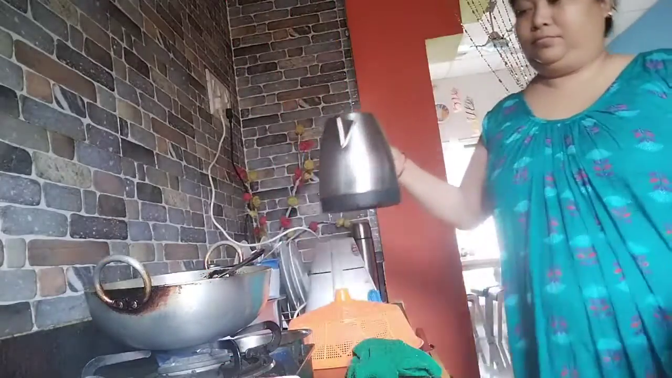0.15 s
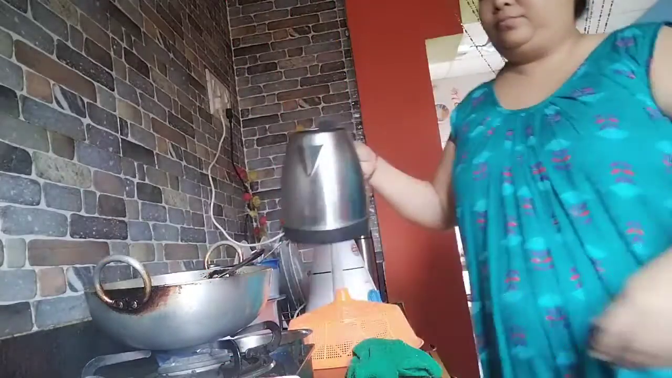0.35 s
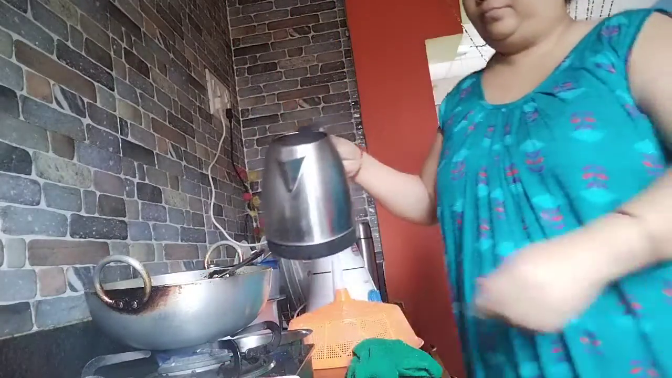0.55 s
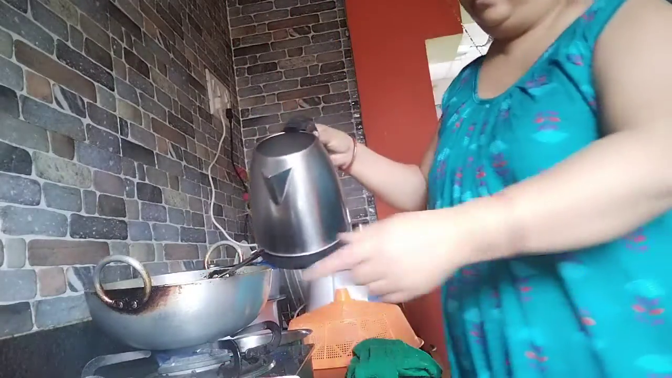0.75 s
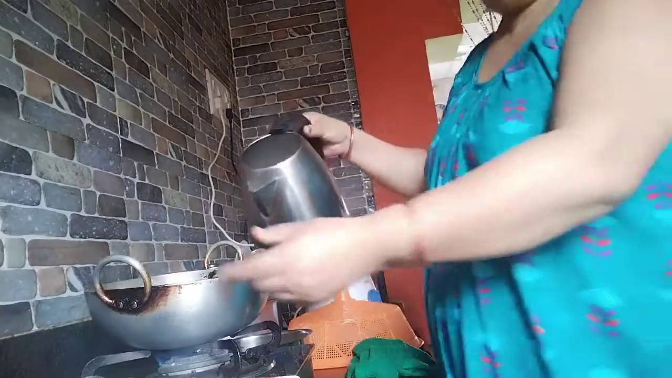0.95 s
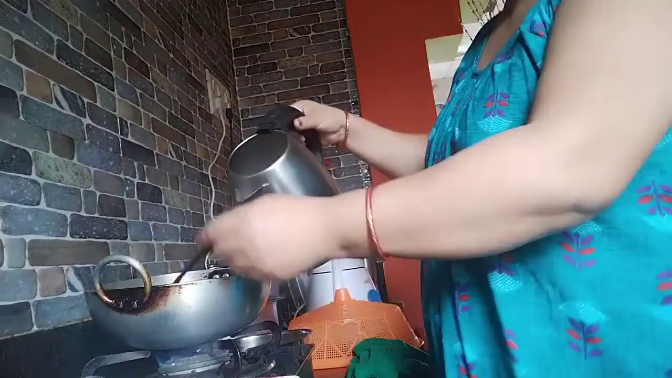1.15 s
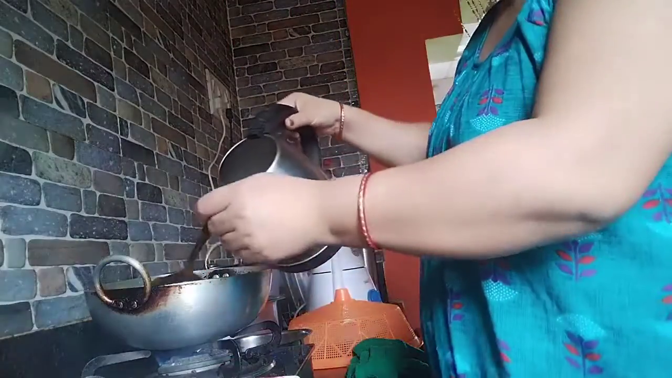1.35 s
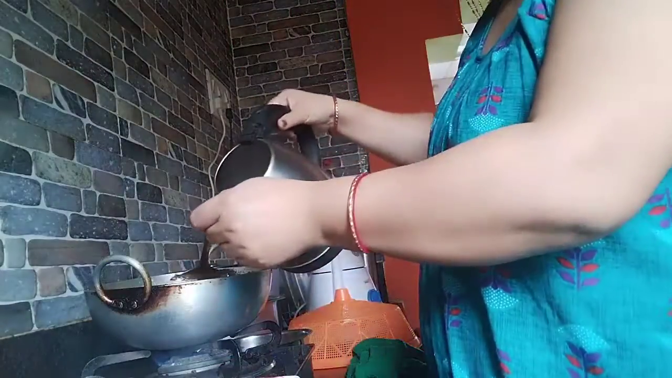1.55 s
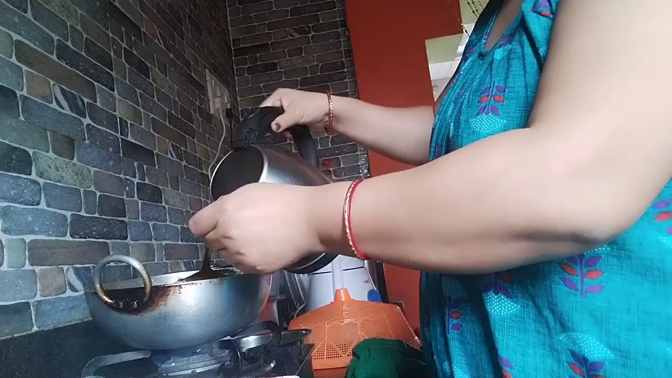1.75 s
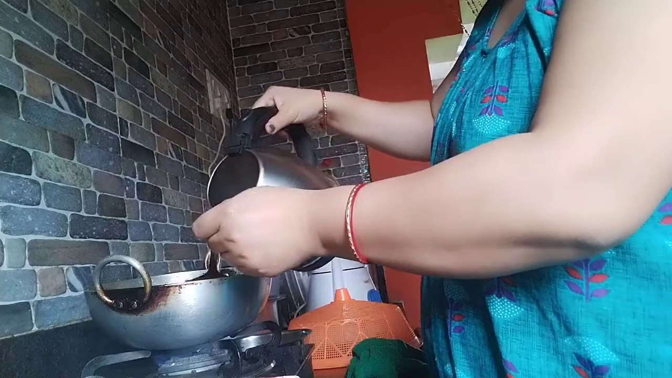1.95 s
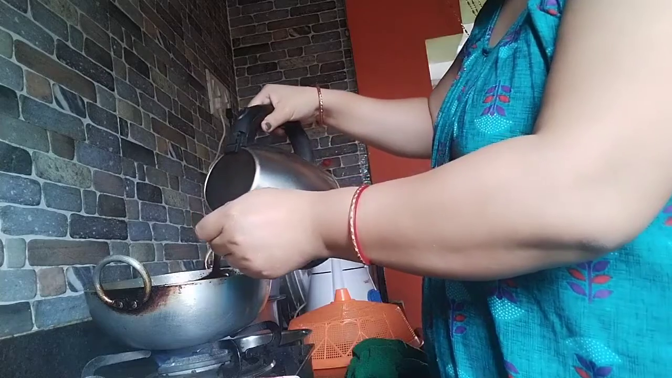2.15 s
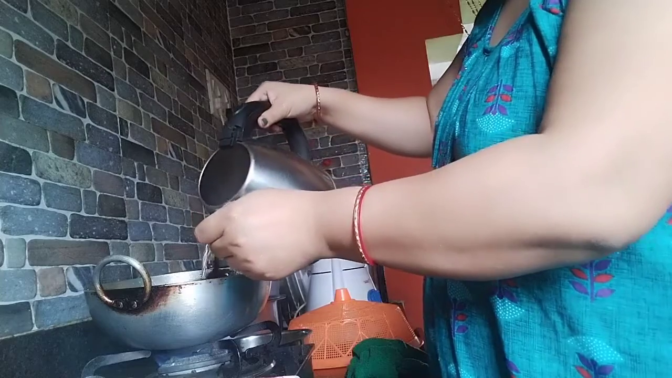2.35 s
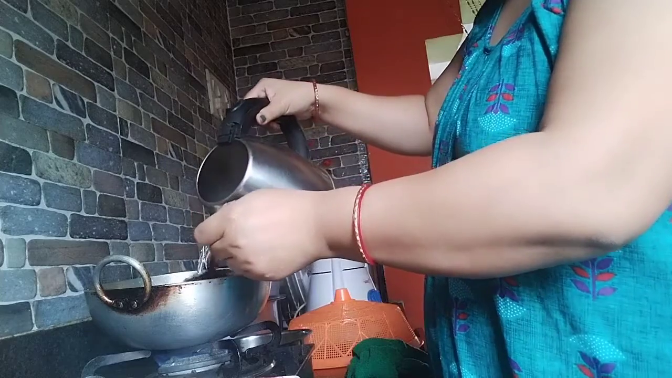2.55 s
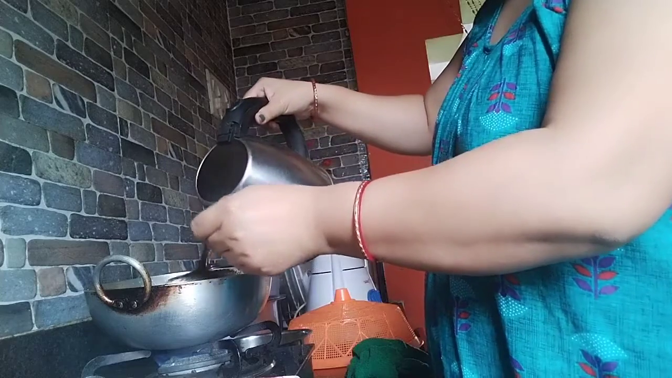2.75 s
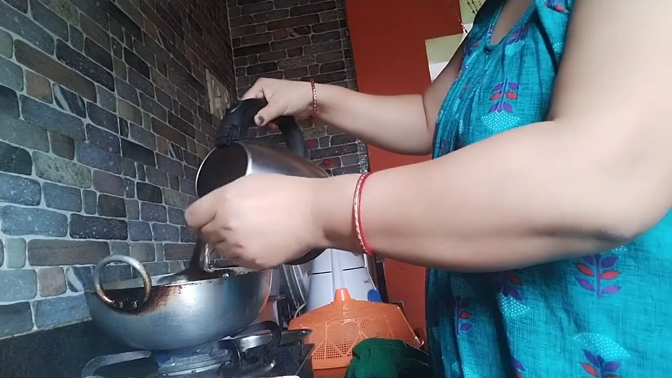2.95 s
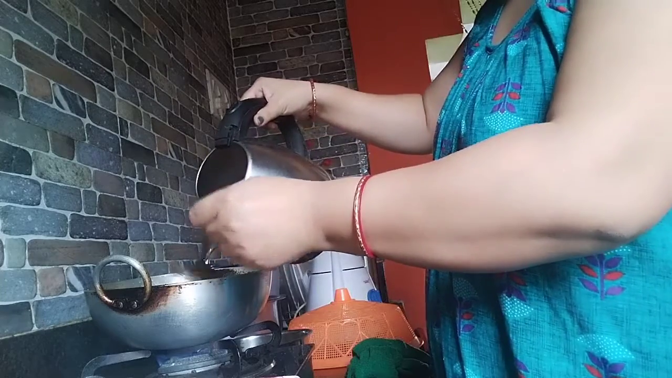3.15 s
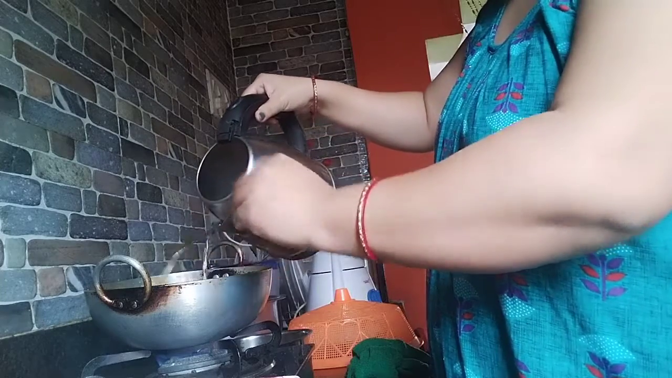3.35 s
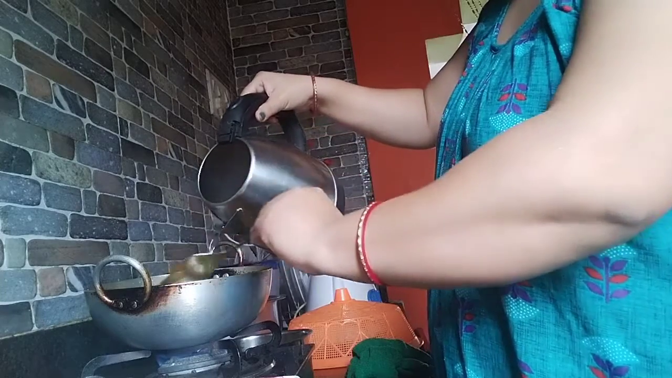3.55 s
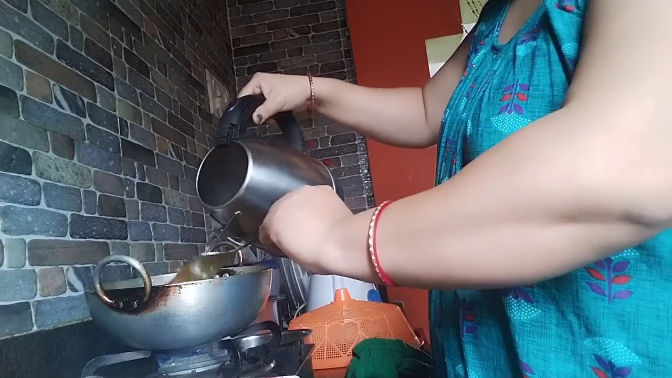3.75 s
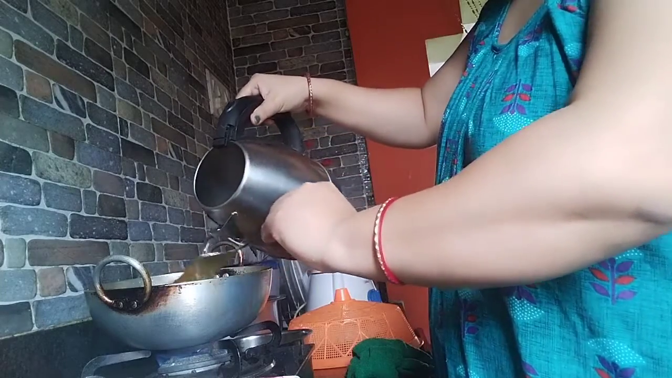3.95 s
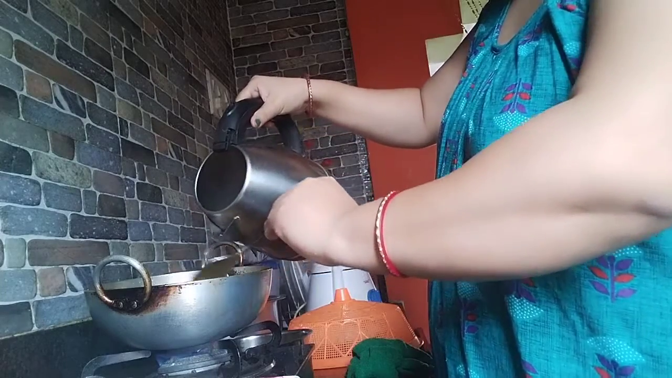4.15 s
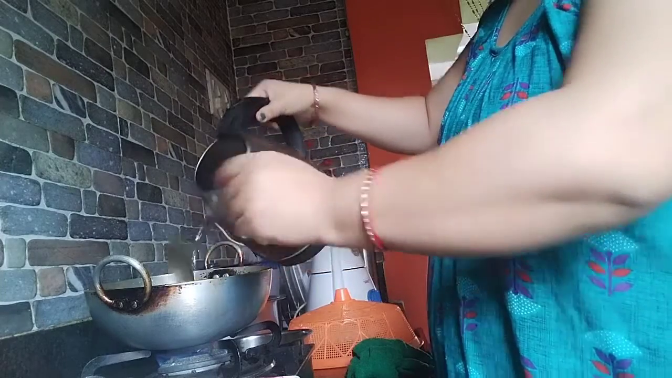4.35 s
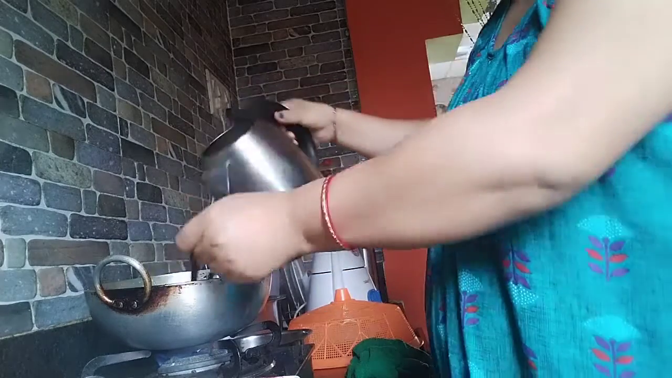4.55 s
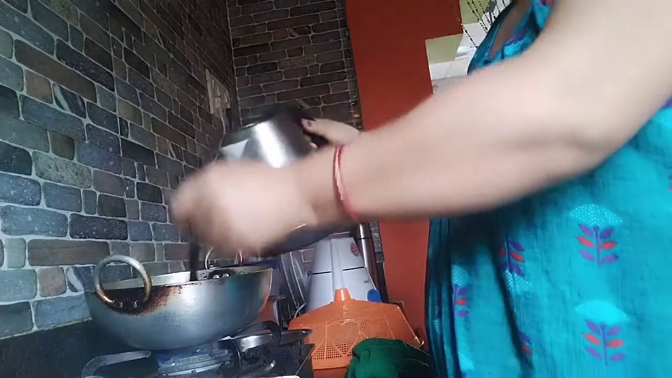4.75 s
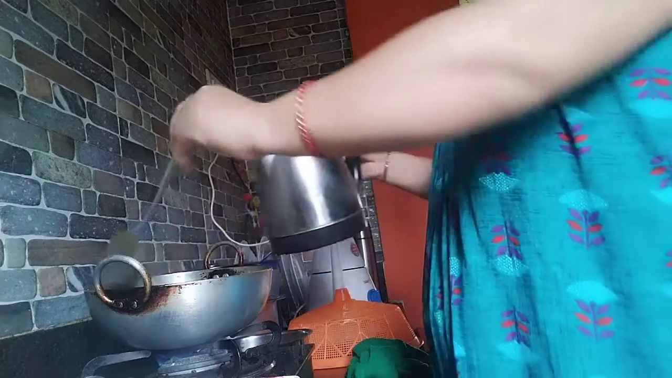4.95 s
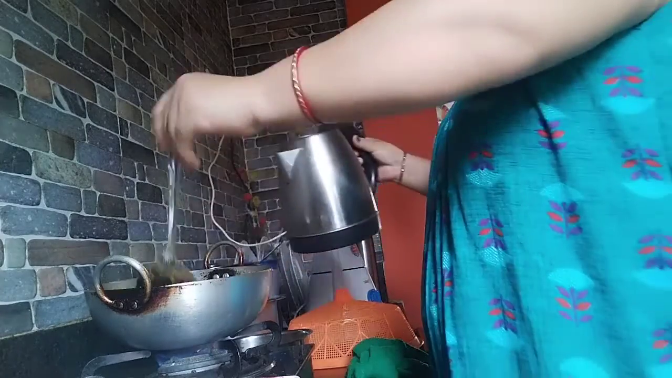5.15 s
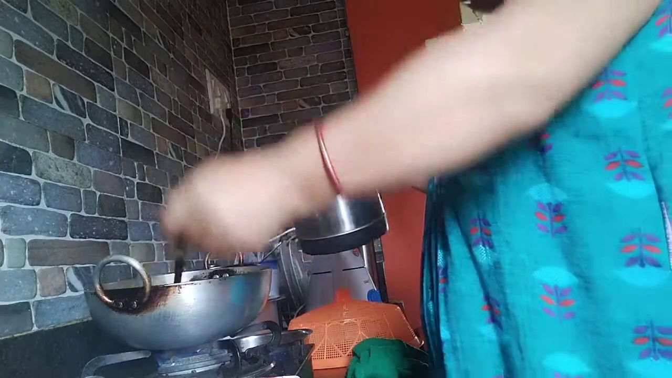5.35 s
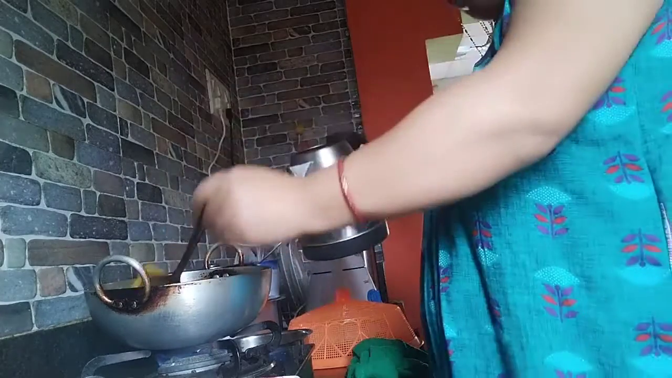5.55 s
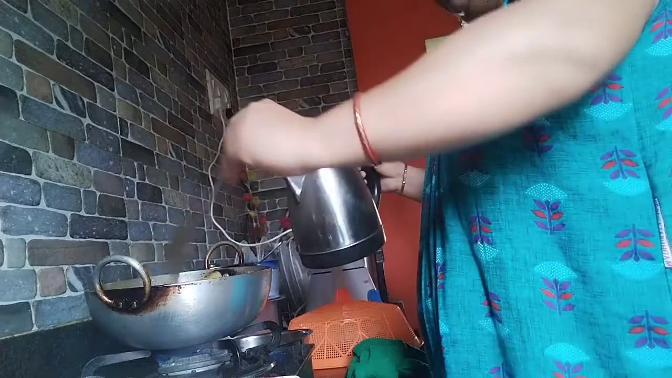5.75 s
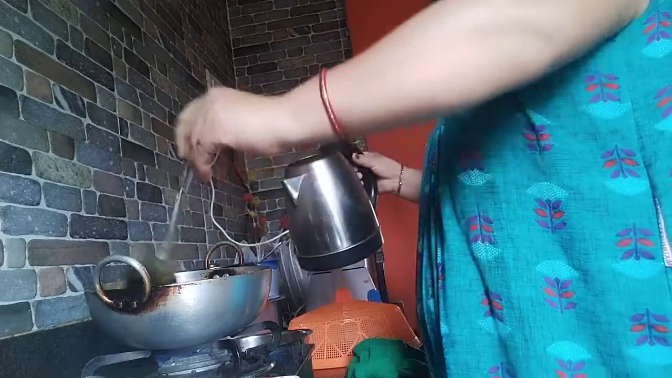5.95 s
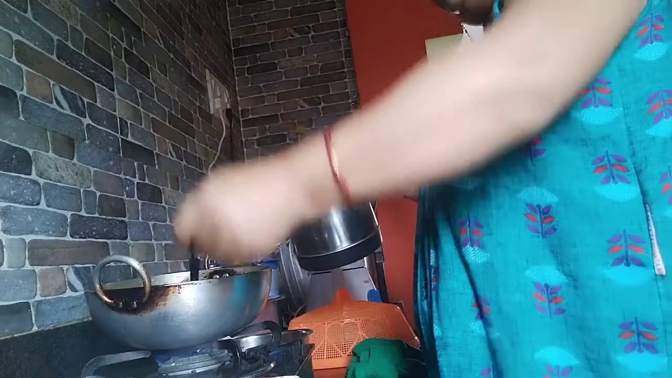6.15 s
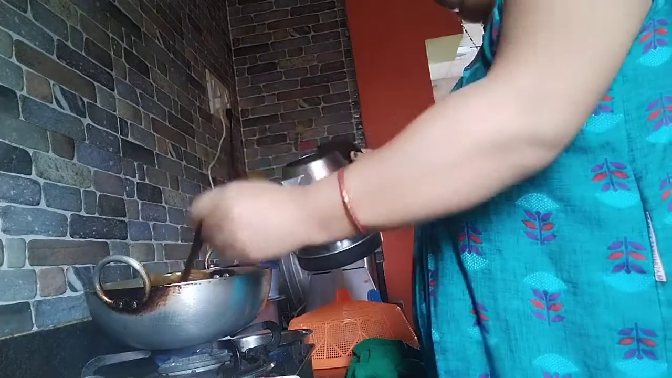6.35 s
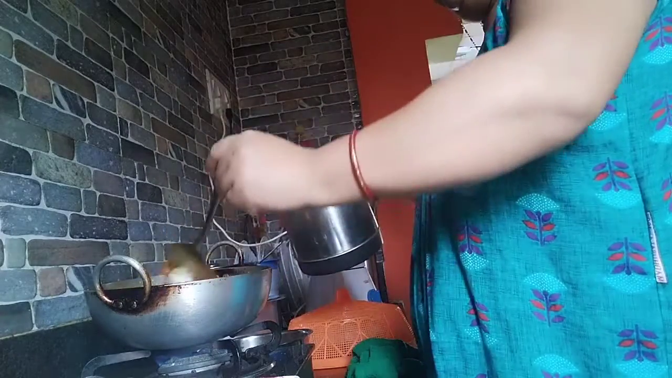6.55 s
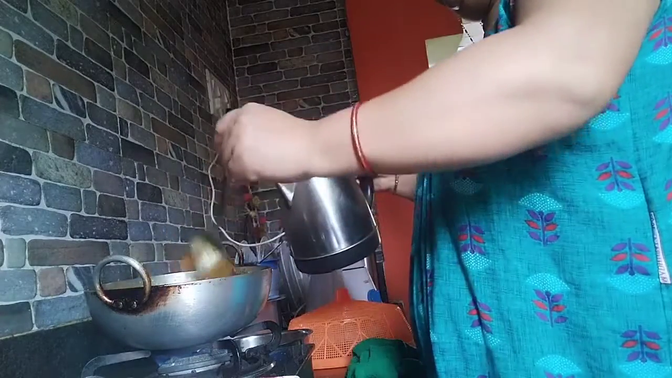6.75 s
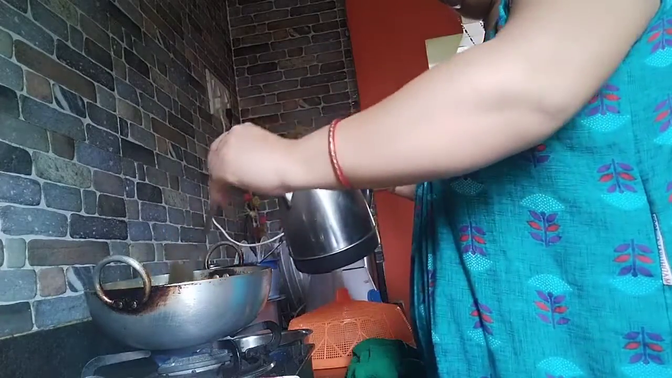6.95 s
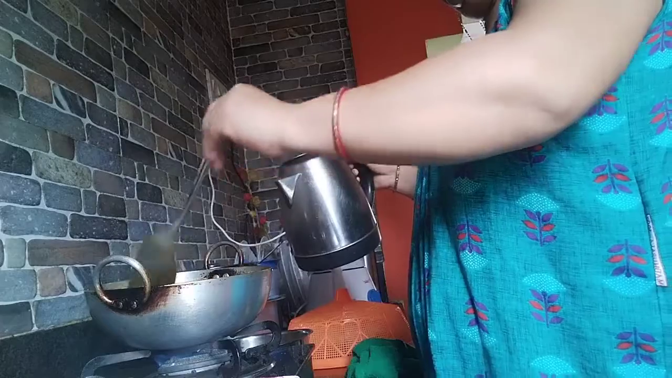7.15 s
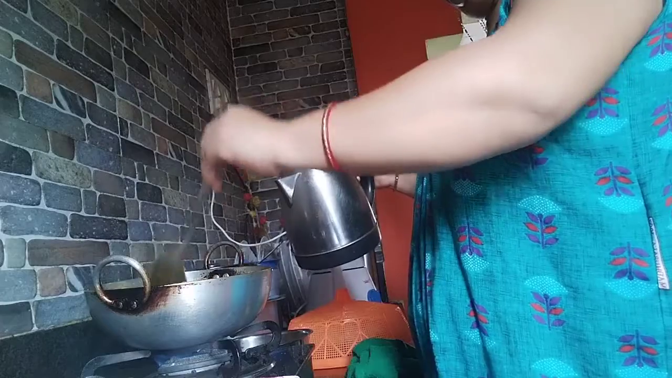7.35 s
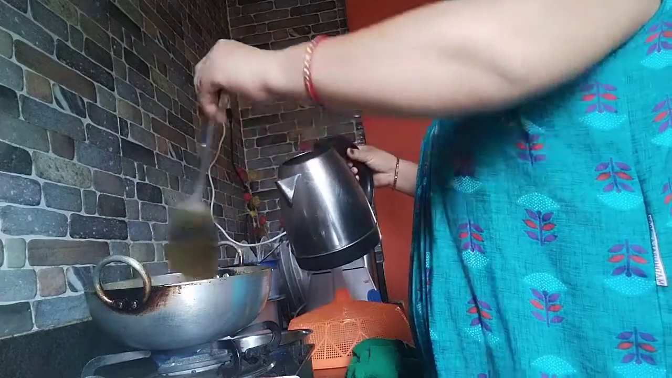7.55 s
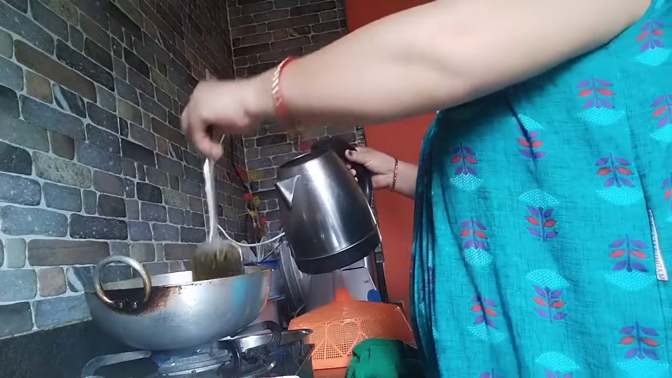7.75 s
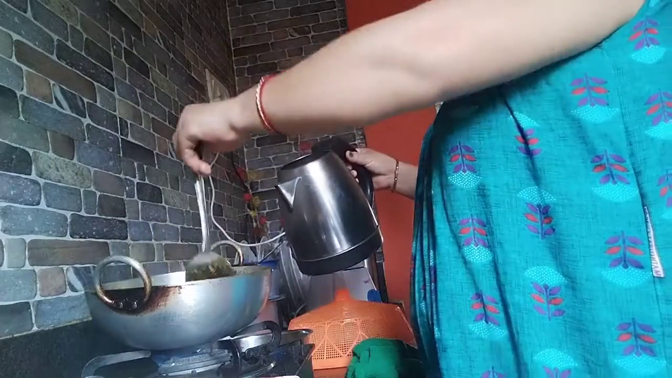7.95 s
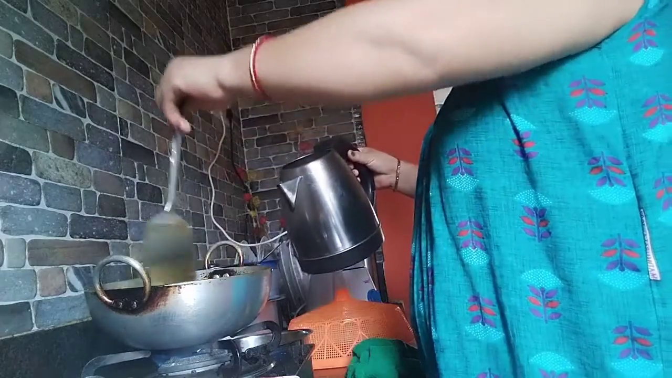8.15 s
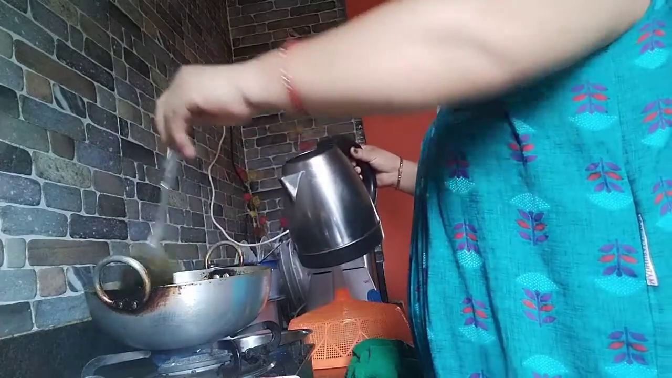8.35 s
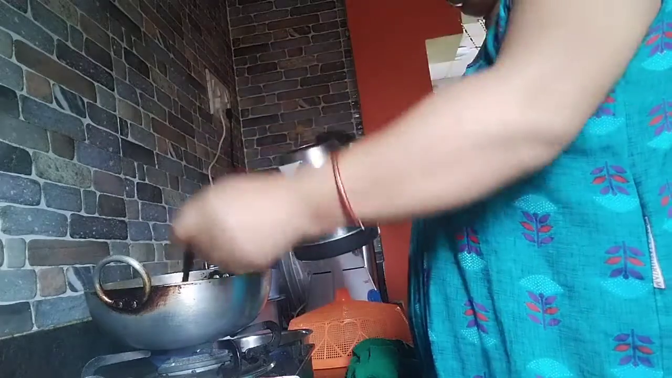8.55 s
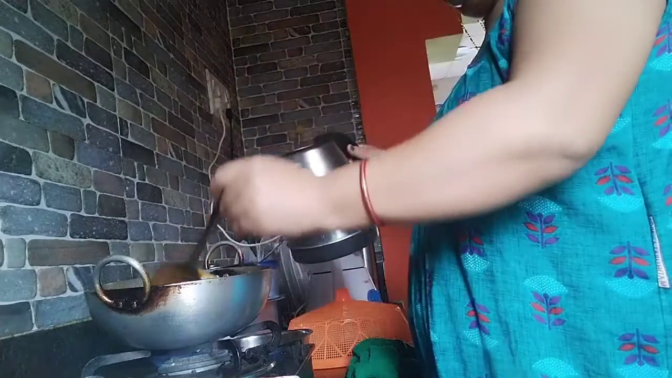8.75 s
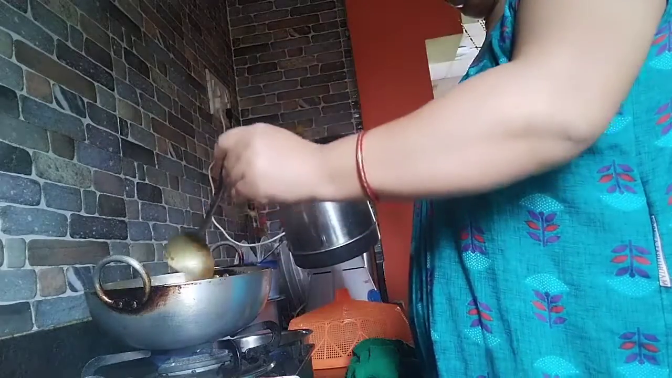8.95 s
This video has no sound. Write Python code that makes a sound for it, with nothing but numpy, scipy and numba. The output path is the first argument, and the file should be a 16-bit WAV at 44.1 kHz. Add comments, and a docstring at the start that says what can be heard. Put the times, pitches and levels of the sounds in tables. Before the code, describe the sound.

First, soft hiss and crackle of hot fat, with small flares and spits, a low steady hum, faint hooting calls outside and short water glugs. Then a ladle strikes and drags on a food-filled steel pan in irregular bursts, some loud and ringing, some light. The sizzle dies down late. Close phone microphone, slight short echo from hard tiles, dull top end.

```python
"""Kitchen stove: a ladle knocks and scrapes a steel pan full of food, an arm's length from a phone.
Blows (short noise cracks) and stick-slip clicks drive broad bands and tuned resonators, the pan's modes.
Filtered noise and clicks sizzle, with flares and spits, later fainter, as is the low hum of coloured noise.
Poured water glugs as decaying sines; narrow noise makes a hollow, warbling call from outdoors.
Delay lines echo the pan and the glugs from the tiles."""
import sys
import numpy as np
from scipy import signal
from scipy.fft import rfft, irfft, next_fast_len
from scipy.io import wavfile
from scipy.ndimage import uniform_filter1d
from numba import njit

SR = 44100
rng = np.random.default_rng(int(sys.argv[2]) if len(sys.argv) > 2 else 0)


def bounce(signal):
    """Save signal as a 16-bit WAV file at the path given by the first command-line argument."""
    frames = np.transpose(np.atleast_2d(signal))
    limited = np.clip(frames, -1, 1)
    pcm = np.round(limited * 32767).astype(np.int16)
    wavfile.write(sys.argv[1], SR, pcm)


N = 396018

# broad bands of the struck pan, in order thud, clang, ring, tick, grit: [f/Hz, width/Hz]
BANDS = [(360, 620), (1000, 800), (2300, 2130), (4200, 1150), (6700, 12000)]


def undb(db):
    """Decibels to gain."""
    return 10 ** (np.asarray(db) / 20)


def unit(x):
    """Scale to rms 1."""
    return x / np.sqrt(np.mean(x ** 2))


def walk(rate_hz):
    """Random levels held 1 / rate_hz s, then slewed twice; spread near 1."""
    hold = int(SR / rate_hz)
    steps = np.repeat(rng.standard_normal(N // hold + 1), hold)
    return 1.796 * uniform_filter1d(uniform_filter1d(steps, hold), hold)[:N]


def clicks(per_s, spread_db):
    """Random clicks of either sign and exponentially spread level, rms 1."""
    hits = rng.random(N) < per_s / SR
    sign = rng.choice([-1, 1], N)
    size_db = spread_db * np.minimum(rng.exponential(size=N), 4.5)
    return unit(hits * sign * undb(size_db))


def curve(rows):
    """Gain along a table of (t/s, level/dB) points."""
    return undb(np.interp(np.arange(N) / SR, *np.transpose(rows)))


def swell(notes):
    """Summed powers of rows (t at full level/s, level/dB, rise/(dB/s), hold/s, fall/(dB/s)), as a gain."""
    t, power = np.arange(0, N + 32, 32) / SR, 1e-14
    for s, db, rise, hold, fall in notes:
        early_s = np.maximum(s - t, 0)
        late_s = np.maximum(t - s - hold, 0)
        power = power + undb(2 * (db - rise * early_s - fall * late_s))
    return np.interp(np.arange(N) / SR, t, np.sqrt(power))


@njit
def svf(x, hz, width):
    """State-variable band-pass with a moving centre, gain 1 at the centre."""
    y, b, l = np.empty(len(x)), 0., 0.
    for i in range(len(x)):
        g, k = np.tan(np.pi * hz[i] / SR), width / hz[i]
        v = (b + g * (x[i] + 1e-18 - l)) / (1 + g * (g + k))
        b, l, y[i] = 2 * v - b, l + 2 * g * v, k * v
    return y


def band(x, hz, width):
    """Fixed fourth-order band-pass."""
    half = np.sqrt(hz ** 2 + width ** 2 / 4)
    edges_hz = [half - width / 2, half + width / 2]
    return signal.sosfilt(signal.butter(2, edges_hz, "band", fs=SR, output="sos"), x)


def coloured(source, colour, flicker_db):
    """Shape a source by a spectrum, rms 1; overlapping bands half an octave apart flicker on their own."""
    hz, db = np.transpose(colour)
    size = next_fast_len(N)
    octave = np.log2(np.arange(1, size // 2 + 2) * SR / size)
    spectrum = rfft(source, size) * undb(np.interp(octave, np.log2(hz), db))
    out = 0
    for centre in np.arange(np.log2(hz[0]), np.log2(hz[-1]), .5):
        triangle = np.maximum(1 - 2 * abs(octave - centre), 0)
        out = out + undb(flicker_db * walk(18)) * irfft(spectrum * triangle, size)[:N]
    return unit(out)


def hum():
    """Burner roar and far traffic: coloured noise under a slow level curve."""
    # level: [t/s, level/dB]
    hum_level = [(0, -66), (.63, -64), (2.27, -66.5), (2.53, -62.5), (2.9, -66), (5.1, -67), (6.2, -68),
                 (7.7, -70.5), (8.98, -72.5)]
    # relative spectral density: [f/Hz, density/dB]
    hum_colour = [(15, -64.5), (25, -34), (37, -19), (103, 2.5), (145, -3.5), (230, 0), (398, -4.5),
                  (506, -4.5), (586, -7), (666, -2), (830, -3.5), (1410, -5.5), (2000, -27), (2600, -30.5),
                  (4400, -120)]
    return coloured(rng.standard_normal(N), hum_colour, 1.0) * curve(hum_level)


def call():
    """A hollow call from outdoors: two close, wavering tones of narrow noise beat against each other."""
    # notes: [t at full level/s, level/dB, hold/s, fall/(dB/s)]
    call_notes = [(0.638, -54, 0.24, 248), (0.933, -49.5, 0.21, 115), (1.318, -61.5, 0.008, 300),
                  (4.11, -50.5, 0.0086, 896), (4.156, -45, 0.031, 600), (4.207, -51, 0.013, 300),
                  (4.257, -53.5, 0.074, 140), (4.475, -61.5, .005, 144), (5.045, -50, 0.15, 250),
                  (5.306, -51.5, 0.33, 116)]
    # faint side tones: [f/Hz, level re main tones/dB]
    side_tones = [(650, -15), (1120, -22.5)]
    centre_hz, waver_hz, offset_hz, width_hz = 747, 4, 20.6, 42.3
    rise_db_per_s = 600
    pair, hz = 0, centre_hz + waver_hz * walk(9)
    for side in (-1, 1):
        tone = rng.standard_normal(N)
        for _ in range(3):
            tone = svf(tone, hz + side * offset_hz, width_hz)
        pair = pair + tone
    # level out swings slower than the 68 ms window
    steady = pair / np.sqrt(uniform_filter1d(pair ** 2, size=3000))
    for side_hz, db in side_tones:
        steady = steady + undb(db) * unit(band(rng.standard_normal(N), side_hz, width_hz))
    return steady * swell([(s, db, rise_db_per_s, hold, fall) for s, db, hold, fall in call_notes])


def sizzle():
    """Tiny steam bubbles burst in the fat: hiss and crackle, flares where water meets it, louder spits."""
    # steady level: [t/s, level/dB]
    sizzle_level = [(0, -59.5), (1.5, -59.5), (1.9, -58.5), (3.6, -61), (4.5, -62), (4.67, -67), (5.1, -67),
                    (5.9, -58.5), (6.8, -70.5), (7.7, -74.5), (8.35, -77), (8.98, -77.5)]
    # relative spectral density: [f/Hz, density/dB]
    sizzle_colour = [(900, -10.5), (1300, -5.5), (1500, -2.5), (1950, -5), (2400, 2), (3100, 1.5),
                     (3900, 4), (4700, -3), (6000, -2.5), (7300, -6.5), (8400, -12), (9300, -27),
                     (11000, -29.5), (12000, -23), (13500, -35), (15000, -20), (16000, -26)]
    # water meets hot fat: [t at full level/s, level/dB]
    flares = [(.81, -55), (1.59, -76), (2.67, -56.5), (4.53, -64)]
    # fat spitting: [t/s, level before decay/dB, f/Hz]
    spits = [(0.7994, -59, 2840), (1.131, -56.5, 2510), (1.176, -56.5, 2600), (1.5843, -56.5, 4200),
             (1.873, -53.5, 3870), (1.944, -58, 2430), (2.143, -59, 3930), (2.211, -57, 2870),
             (2.6585, -52.5, 4740), (2.821, -60, 3800), (3.09, -61, 3530), (3.5438, -60, 2440),
             (3.791, -58, 3140), (4.084, -59, 3540), (4.389, -60, 3160), (4.518, -58.5, 3900),
             (4.81, -63, 3930), (6.67, -65, 3940), (7.778, -68, 6600), (8.842, -68.5, 2820)]
    crackle_per_s, crackle_spread_db, crackle_db = 450, 1.5, -7
    flare_rise_db_per_s, flare_fall_db_per_s = 196, 160
    burst = rng.standard_normal(N) + undb(crackle_db) * clicks(crackle_per_s, crackle_spread_db)
    hiss = coloured(burst * undb(0.26 * walk(17)), sizzle_colour, 1.0)
    flare_gain = swell([(s, db, flare_rise_db_per_s, 0, flare_fall_db_per_s) for s, db in flares])
    out = hiss * np.hypot(curve(sizzle_level), flare_gain)
    fade = np.exp(-np.arange(600) / SR / 0.025)
    for (s, db, hz), grit in zip(spits, rng.standard_normal((len(spits), 600))):
        i = int(s * SR)
        out[i:i + 600] += undb(db) * fade * unit(band(grit, hz, 0.3 * hz))
    return out


def glugs():
    """Air pockets in the poured water ring briefly: decaying sines with a 12 ms onset ramp."""
    # [t/s, level before ramp and decay/dB, f/Hz, T60/s]
    air_pockets = [(1.128, -38, 940, 0.048), (2.467, -50.5, 516, 0.14), (2.509, -50, 524, 0.13)]
    out, time = np.zeros(N), np.arange(6000) / SR
    for s, db, hz, t60 in air_pockets:
        envelope = np.minimum(time / 0.012, 1) * 1000 ** (-time / t60)
        i = int(s * SR)
        out[i:i + 6000] += undb(db) * envelope * np.sin(2 * np.pi * hz * time)
    return out


def contact():
    """Force of ladle on steel per band: noise cracks for blows, stick-slip clicks for rattles and drags."""
    # blows: [t/s, level/dB, tilt/(dB/octave), bend/(dB/octave^2), thud re level/dB, rattle re level/dB]
    blows = [(5.16, -43, 6, -0.5, -26, -4), (5.233, -33, 1, -1, -36, -6.5),
             (5.304, -28.5, -4, 1.5, -16, -15), (5.349, -32, -5.5, -1, 7, -7.5),
             (5.413, -36, -11, -1, -7, -18), (5.496, -44, 1, 2.5, -16.5, -7.5),
             (5.995, -24.5, 1.6, 1.5, -15.5, -14), (6.071, -39, 0.5, 2, -7.5, -6),
             (6.124, -14, 0, -3.5, -16, -13), (6.196, -28.5, 23, -19, -17.5, -14),
             (6.229, -35.5, 5, -3.5, -18.5, 0), (6.509, -39, 4.5, -4, -26.5, -9),
             (7.009, -35, -4, 1, -19, -6.5), (7.333, -30.5, -7, 4.5, -3, -9),
             (7.881, -14.5, -2, 0, -20.5, -13.5), (8.39, -51, 21.5, -16.5, -16.5, -2.5),
             (8.523, -48, -7, -1, -26, -6), (8.541, -43.5, 11, -7, -25.5, -2),
             (8.553, -45, -9, 0, -20, -14), (8.608, -49.5, -5, -1.5, -20, -9)]
    # drags: [t at full level/s, level/dB, tilt/(dB/octave), bend/(dB/octave^2), thud re level/dB,
    #         rise/(dB/s), hold/s, fall/(dB/s)]
    drags = [(5.169, -48, 3.5, 0.5, -24, 780, 0.046, 250), (5.298, -44, -3, 0, -0.5, 400, 0.085, 200),
             (5.41, -44.5, -2.5, 1.8, -7, 399, 0.035, 85), (5.603, -54, 4, 0, -14, 102.6, 0.037, 27),
             (6.052, -42.5, -6, -12, -16, 293, 0.066, 200), (6.145, -36, -5, -6.5, -26, 890, 0.028, 199),
             (6.257, -42, -2.3, 0.7, -19, 197.5, 0.02, 161), (6.335, -54, -3.5, 2, -4, 300, 0.024, 173),
             (7.913, -37, -7, -6.5, -1, 884, 0.068, 196), (8.076, -45, -10.5, -6.5, 3, 198, 0.013, 146),
             (8.502, -50.5, 0.5, 0.5, -20, 197, 0.054, 104),
             (8.589, -42.5, -0.5, 0, -14.5, 151.5, 0.013, 159), (8.664, -55, 2, 0, -17, 204, 0.0087, 176)]
    # how readily each band answers the ladle: [gain/dB]
    answer_db = [-3, -1.5, -2, -3.5, -4.5]
    # how fast each band dies: [factor on fall rate]
    fall_share = [1.22, 1.3, 1.17, 1.19, 1.04]
    crack_decay_s, crack_rise_s = 0.0042, 0.0024
    crack_thud_db = -2.5  # a crack is too short to drive the bass fully
    rattle_rise_db_per_s, rattle_fall_db_per_s, thud_hold_s = 4000, 190, 0.027
    slips_per_s, slip_spread_db = 1200, 0.5
    judder_db, judders_per_s = 1.3, 110

    slips = unit(clicks(slips_per_s, slip_spread_db) + rng.standard_normal(N))
    slips = slips * undb(judder_db * walk(judders_per_s))
    time = np.arange(1500) / SR
    grit = rng.standard_normal(N)
    fade = np.minimum(time / crack_rise_s, 1) * np.exp(-time / crack_decay_s)

    def level_db(k, db, tilt, bend, thud):
        """Level in band k; the thud has its own, the rest follow tilt and bend about the ring band."""
        octaves = np.log2(BANDS[k][0] / BANDS[2][0])
        return answer_db[k] + db + (thud if k == 0 else tilt * octaves + bend * octaves ** 2)

    force = []
    for k, (_, width) in enumerate(BANDS):
        even = np.sqrt(SR / 2 / width)  # white force that gives rms 1 inside the band
        hold_s = thud_hold_s if k == 0 else 0
        rattle_fall = rattle_fall_db_per_s * fall_share[k]
        notes = [(s + crack_decay_s, level_db(k, *colour) + rattle, rattle_rise_db_per_s, hold_s, rattle_fall)
                 for s, *colour, rattle in blows]
        notes += [(s, level_db(k, *colour), rise, hold, fall * fall_share[k])
                  for s, *colour, rise, hold, fall in drags]
        push = swell(notes) * slips
        for s, *colour, _ in blows:
            i = int(s * SR)
            crack_db = level_db(k, *colour) + (crack_thud_db if k == 0 else 0)
            push[i:i + 1500] += undb(crack_db) * fade * grit[i:i + 1500]
        force.append(even * push)
    return force


def pan():
    """Dense small modes of the food-damped steel act as broad bands; the strong ones ring out as lines."""
    # modes: [f/Hz, relative level/dB, width/Hz]
    modes = np.array([(268, -4, 16), (336, -7, 16), (380, -3, 25), (533, -2, 16), (742, -1, 35),
                      (935, -2, 32), (1012, -2, 35), (1106, -2, 40), (1180, -4, 30), (1270, -3, 25),
                      (1440, -4, 45), (1640, -4, 40), (1730, -6, 30), (1800, -6, 55), (2020, -9, 90),
                      (2390, -4, 40), (2510, -6, 40), (2630, -6, 35), (2820, -8, 22), (2910, -6, 30),
                      (3155, -3, 30), (3470, -6, 40), (3700, -4, 50), (3940, -4, 22), (4110, -2, 45),
                      (4690, -6, 30), (4810, -6, 60), (5070, -8, 50), (5450, -6, 18), (5700, -6, 20),
                      (6200, -6, 40), (6810, -5, 35), (7180, -5, 50)])
    # where the ladle touches decides which modes are driven most: [from t/s, [(mode f/Hz, boost/dB), ..]]
    touches = [(5.15, [(268, 7), (925, 21), (1730, 13), (2630, 22), (3900, 4), (4690, 13)]),
               (5.23, [(335, 13), (1110, 16), (2510, 1), (3170, 16), (5070, 20)]), (5.28, [(335, 7),
               (1020, 19), (1440, 16.5), (2510, 2), (4110, 6)]), (5.347, [(268, 12), (535, 13), (925, 10),
               (1110, 8), (1812, 10), (2910, 8), (3710, 10), (4110, 12)]), (5.385, [(268, 9), (335, 8),
               (535, 13), (742, 8), (2910, 6)]), (5.532, [(382, 5), (1110, 10), (3170, 13.5)]),
               (5.99, [(268, 7), (925, 10), (1110, 0.5), (2395, 18.5), (3170, 13), (3710, 20), (4690, 17.5),
               (5070, -1), (6800, 8)]), (6.03, [(268, 6), (1110, 6), (2395, 8), (2510, 6), (4690, 10)]),
               (6.12, [(268, 12), (925, 11), (1730, 9), (1812, 13), (2395, 10), (3470, 8), (4110, 18)]),
               (6.19, [(335, 7), (1110, 7), (1812, 4), (3900, 12), (4110, 14)]), (6.225, [(335, 4),
               (1110, 8), (2510, 8), (4110, 5), (5720, 20)]), (6.3, [(382, 3), (742, -1), (1270, 4)]),
               (6.505, [(1812, 16), (2020, 20)]), (6.528, [(1270, 12), (1440, 10), (1640, 12), (2020, 14)]),
               (7.0, [(742, 14), (1180, 18), (1440, 10), (2395, 10), (2780, 14), (3900, 17), (5480, 20),
               (5720, 16)]), (7.33, [(268, 16), (742, 12), (925, 10), (1020, 21), (2510, 8), (4110, 6),
               (7200, 9)]), (7.87, [(268, 6), (1020, 6), (1440, 9), (2395, 8), (3170, 10), (3710, 8)]),
               (7.905, [(382, 2), (535, -6), (742, -6), (2910, 3)]), (8.06, [(268, 6), (535, -8), (742, -6),
               (1812, 7), (2630, 5), (5720, 10)]), (8.385, [(925, 23), (1730, 15.5), (2630, 18), (3170, 17),
               (3900, 12.5), (4800, 15), (6200, 10)]), (8.46, [(925, 22), (1640, 8), (2395, 6), (3710, 6),
               (5480, 8)]), (8.57, [(335, 10), (925, 13), (4110, 15), (5720, 19), (6800, 16)]),
               (8.63, [(742, 6.5), (1110, 8), (3170, 5), (4110, -3)])]
    mode_db, mode_scatter_db = -8, 2.5
    mic_knee_hz, mic_top_db = 8230, -23.5

    starts_s = [s for s, _ in touches]
    place = np.searchsorted(starts_s, np.arange(N) / SR, side="right").clip(1) - 1
    favour_db = np.zeros((len(modes), len(touches)))
    for j, (_, favoured) in enumerate(touches):
        for hz, db in favoured:
            favour_db[np.argmin(abs(modes[:, 0] - hz)), j] = db
    # each mode belongs to the nearest band
    home = np.argmin(abs(np.log(modes[:, :1] / np.array(BANDS)[:, 0])), axis=1)
    out, force = 0, contact()
    for k, (centre_hz, band_hz) in enumerate(BANDS):
        members = np.flatnonzero(home == k)
        gains = [undb(modes[m, 1] + mode_db + favour_db[m][place] + mode_scatter_db * walk(22))
                 for m in members]
        # contact energy is shared out between the broad band and its modes
        push = force[k] / np.sqrt(1 + sum(gain ** 2 for gain in gains))
        out = out + band(push, centre_hz, band_hz)
        for (hz, _, width), gain in zip(modes[members], gains):
            # moving food loads the steel and detunes each mode a little
            line = svf(gain * push, hz * (1 + 0.0032 * walk(8)), width)
            out = out + line * np.sqrt(band_hz / width / (np.pi / 2))
    # a pan this small radiates no deep bass
    out = signal.sosfilt(signal.butter(6, 245, "high", fs=SR, output="sos"), out)
    # the phone's microphone steps down above its knee; the weak top is added apart
    out = signal.sosfilt(signal.ellip(5, .5, 40, mic_knee_hz, fs=SR, output="sos"), out)
    top = band(force[3] * undb(-11) + force[4], 11000, 5300)
    top = top + undb(6.5) * band(force[4], 12000, 700)
    top = top + undb(12) * band(force[4], 15000, 800)
    return out + undb(mic_top_db) * top


@njit
def walls(x, lags, gain, damp):
    """Room echo: eight delay lines that feed each other, duller on every round."""
    line, soft, out = np.zeros((8, 4096)), np.zeros(8), np.zeros(len(x))
    for i in range(len(x)):
        total = 0.
        for k in range(8):
            soft[k] += (1 - damp) * (gain[k] * line[k, (i - lags[k]) & 4095] - soft[k])
            total += soft[k]
            out[i] += soft[k] * (1 - 2 * (k % 2))
        for k in range(8):
            line[k, i & 4095] = x[i] + 1e-18 + soft[k] - total / 4
    return out


def scene():
    """Pan and glugs close by with their echo from the tiles, over call, sizzle and hum."""
    bass_t60_s, damp, echo_gain_db = 0.47, 0.41, -23
    lags = np.array([401, 523, 661, 787, 947, 1123, 1327, 1543])  # samples
    near = pan() + glugs()
    tiles = walls(near, lags, undb(-60 * lags / SR / bass_t60_s), damp)
    return (near + undb(echo_gain_db) * tiles + call() + sizzle() + hum())[None]


def record(dry):
    """The phone cuts the top: steep low-pass at 15480 Hz."""
    return signal.sosfilt(signal.ellip(10, .2, 70, 15480, fs=SR, output="sos"), dry)


dry = scene()
out = record(dry)
bounce(out)
```